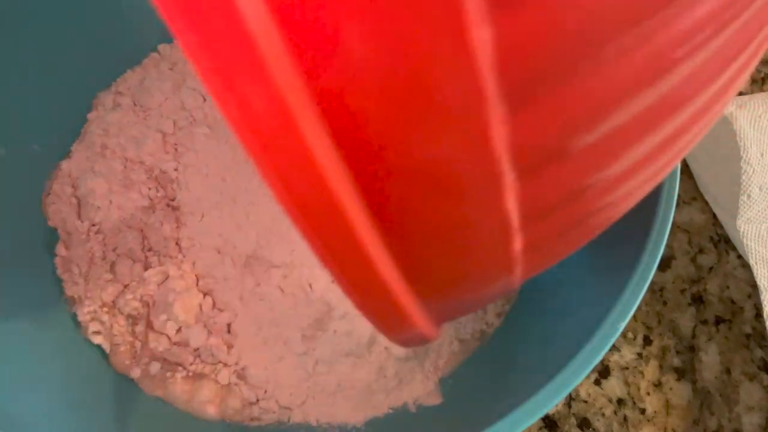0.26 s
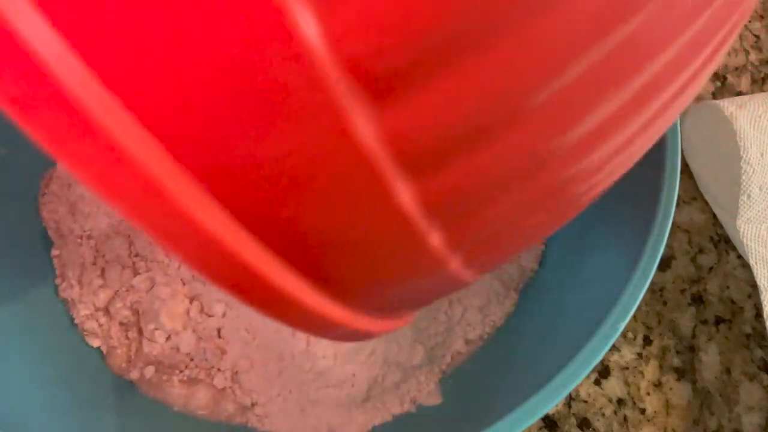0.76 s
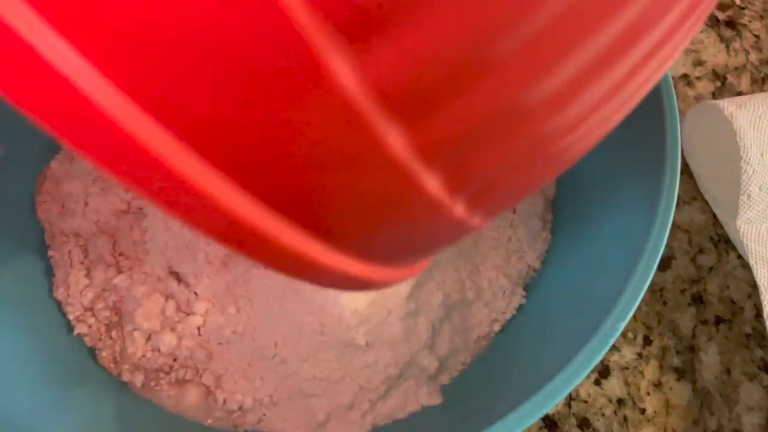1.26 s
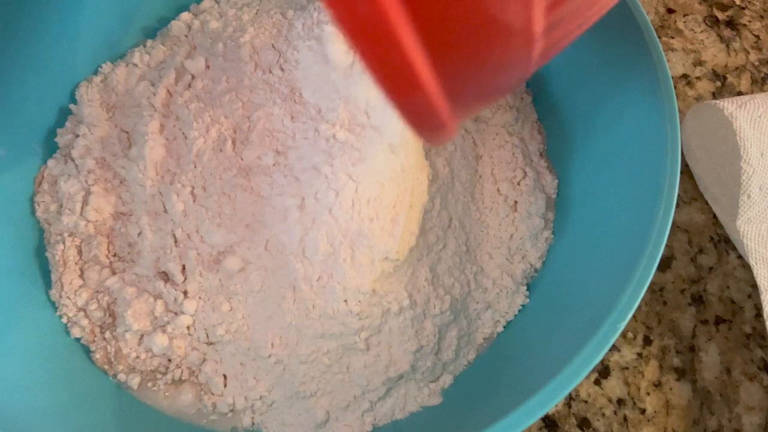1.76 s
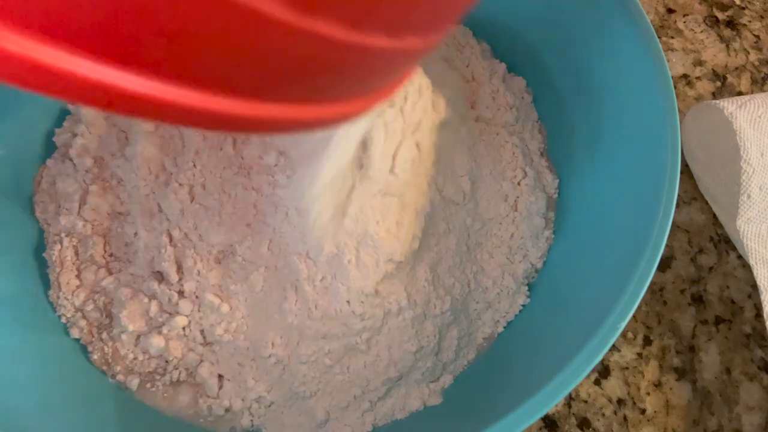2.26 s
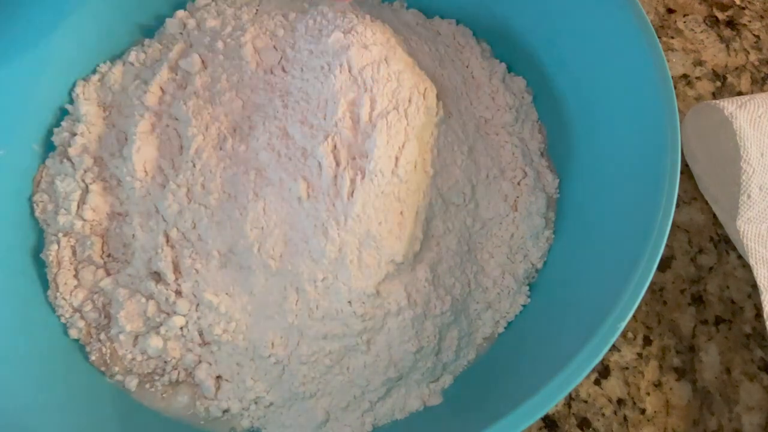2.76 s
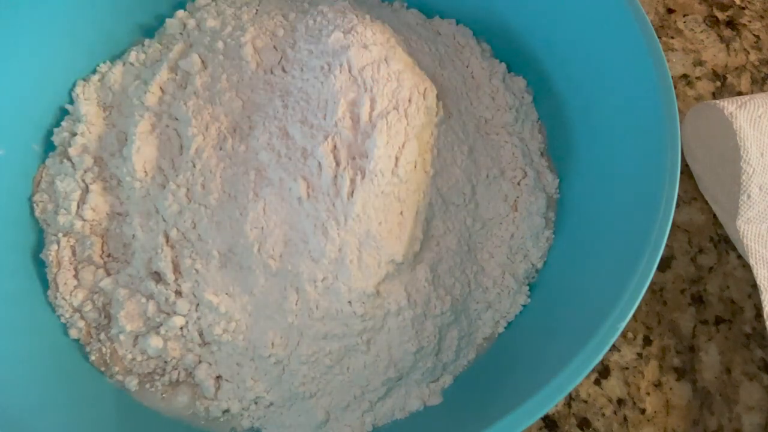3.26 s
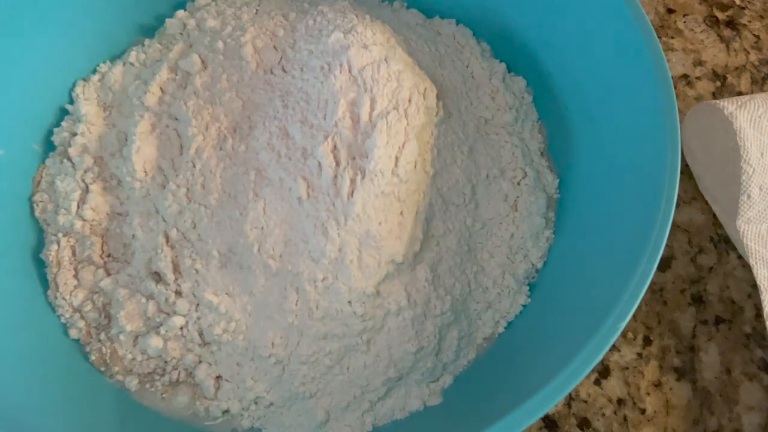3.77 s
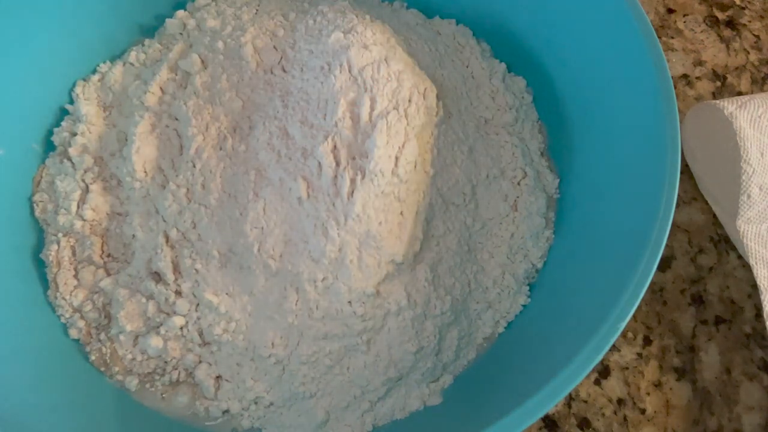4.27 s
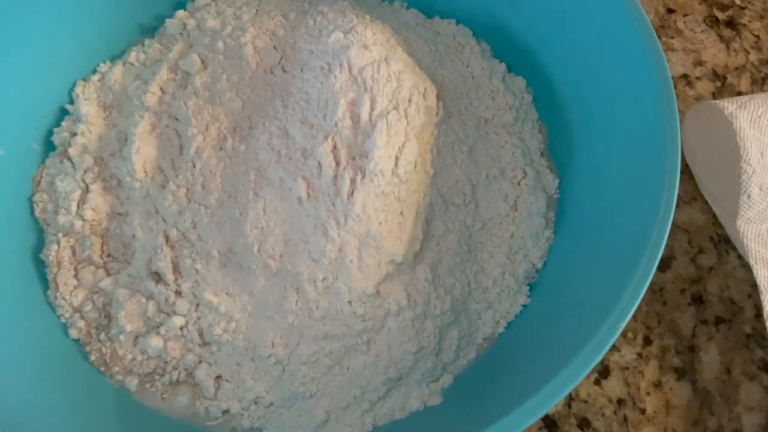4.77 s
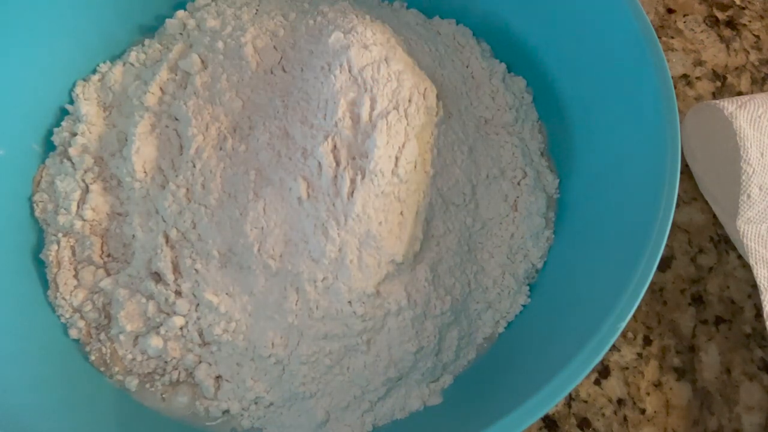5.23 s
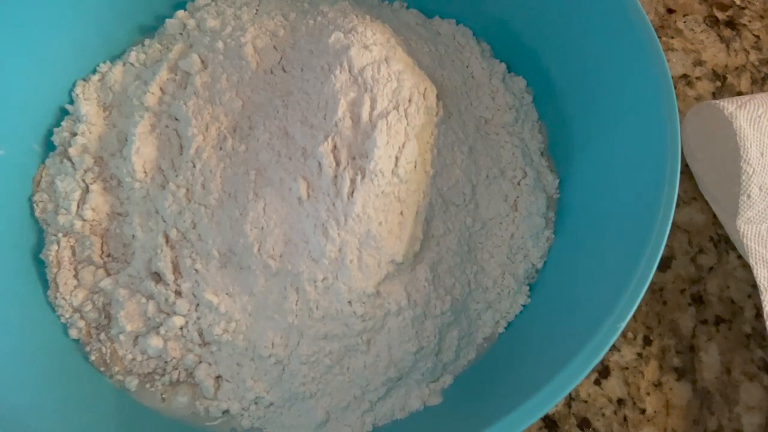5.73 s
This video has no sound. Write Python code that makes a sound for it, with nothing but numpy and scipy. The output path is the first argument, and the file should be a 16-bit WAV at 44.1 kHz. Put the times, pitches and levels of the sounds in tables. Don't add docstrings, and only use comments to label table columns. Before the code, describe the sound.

A steady low refrigerator hum with a soft, slightly wavering fan rumble runs throughout, in a kitchen whose hard walls give short echoes. From 0 to about 1.5 seconds, flour slides in faint, dry, grainy swishes, with barely audible ticks near 1.4 and 1.8. It is quieter until a small rustle at 2.35, then a brighter swish at 3.0 to 3.5. At 3.4 a light tap and a sharp click set off a brief jar ring. Hands brush the plastic softly from 4.0, with small taps, thin squeaks at 4.3 and 4.6 to 4.7, and a growing skid. At 4.76 the tub hits the counter in a very loud, hollow, clipped knock. Smaller clacks follow at 4.9, 5.08 and 5.16, with weaker ticks and a scrape until 5.4. Then the hum remains, with very faint rustles near 5.7 and 5.9. Close stereo microphones add a light hiss.

```python
import sys
import numpy as np
from scipy import signal
from scipy.fft import rfft, irfft
from scipy.io import wavfile
from scipy.ndimage import uniform_filter1d, minimum_filter1d

SR = 44100
rng = np.random.default_rng(int(sys.argv[2]) if len(sys.argv) > 2 else 0)


def decibels_to_gain(level_db):
    exponent = np.asarray(level_db, float) / 20
    return 10 ** exponent


def pcm_store(signal):
    levels = np.round(np.clip(np.atleast_2d(signal), -1, 1) * 32767)
    wavfile.write(sys.argv[1], SR, levels.astype(np.int16).T)


N = 6 * SR


def at_rms(x, db):
    return x * decibels_to_gain(db) / np.sqrt(np.mean(x ** 2))


def along(curve, hz):
    at, value = np.transpose(curve)
    return np.interp(np.log(hz + 1), np.log(at), value)


def sos(order, hz, kind):
    return signal.butter(order, hz, kind, fs=SR, output="sos")


def coloured_noise(gain):
    return irfft(rfft(rng.standard_normal((2, N))) * gain(np.fft.rfftfreq(N, 1 / SR)), N)


def walk(rate):
    k = int(SR / rate)
    held = np.repeat(rng.standard_normal(N // k + 1), k)
    return 1.157 * uniform_filter1d(uniform_filter1d(held, k), k)[:N]


def ring(modes):
    t, out = np.arange(SR // 2) / SR, 0
    for hz, db, t60 in modes:
        decay = np.exp(-np.log(1000) * t / t60)
        build_up = -np.expm1(-t * hz / 0.8)
        out = out + decibels_to_gain(db) * np.sin(2 * np.pi * hz * t) * decay * build_up
    return out


def push(contact):
    t = np.arange(1, 300) / SR
    force = t * np.exp(-4 * t / np.clip(contact, 0.00002, 0.002))
    return force / force.sum()


def blows():
    # t/s, tub level/dB, rim level/dB, crack level/dB, contact/s
    hits = [(1.436, -76, -75, -45.5, 0.000055), (1.767, -75, -86, -54, 0.000025),
            (3.402, -75, -38, -55, 0.00026), (3.4452, -70, -73, -21.5, 0.000095),
            (4.075, -67, -36, -82, 0.0002), (4.315, -82, -54, -44, .0001), (4.595, -70, -44, -40, 0.00016),
            (4.714, -60, -37, -43, 0.00017), (4.733, -60, -36, -50, 0.00014),
            (4.7632, -1, -16, -0.6, 0.00028), (4.902, -24.5, -31.5, -32.5, 0.000099),
            (5.064, -98, -50, -46.5, 0.00007), (5.0796, -17, -12.5, -28, 0.00041),
            (5.1623, -24, -18, -8.5, 0.00019), (5.232, -29, -38, -62, 0.00034),
            (5.263, -40, -25, -37, 0.00017), (5.374, -79, -42.5, -39.5, 0.000094)]
    tub_hz = [129, 190, 290, 361, 390, 500, 514, 552, 730, 929, 1012, 1102, 1400, 1598, 1640, 2110, 2600,
              3128]
    # level/dB, t60/s
    tub_decays = [(-17.5, 0.29), (-18, 0.17), (-8, 0.14), (-11.5, 0.056), (-17.5, 0.077), (10.5, 0.03),
                  (-5, 0.22), (-6.5, 0.19), (-20, 0.2), (-7.5, 0.13), (-13.5, 0.25), (-11.5, 0.17),
                  (-6, .02), (-5, 0.1), (-12, 0.064), (-17.5, 0.15), (-15, 0.21), (-23.5, .15)]
    # f/Hz, level/dB, t60/s
    rim_modes = [(894, 2.5, 0.019), (1400, 6, 0.0098), (1800, 1, 0.0048), (2287, 8, 0.01),
                 (3020, 9.5, 0.006), (3396, 4, 0.012), (3900, -3.5, 0.006)]
    # f/Hz, level/dB, t60/s
    jar_modes = [(496, 2.5, 0.032), (932, 0, 0.052), (1330, 0, 0.025), (1810, -4.5, 0.042),
                 (2140, 9, 0.024), (2670, 10, 0.025), (3490, 9, .018), (3550, -5, 0.03), (4200, -18, 0.016),
                 (4980, -1.5, 0.027), (5830, -1, 0.017), (6240, -23, 0.012)]
    rim_gap_s, base_gap_s = 0.00034, 0.00051
    jar_s, jar_db = 3.4452, -30.5

    tub, rim = ring([(hz, *mode) for hz, mode in zip(tub_hz, tub_decays)]), ring(rim_modes)
    t = np.arange(len(tub)) / SR
    counter = sos(2, [313 / 3, 313 * 2], "bandpass")
    out = np.zeros((2, N + SR))
    for s, tub_db, rim_db, crack_db, contact in hits:
        aside = 0.94 if s > 4 else 0.2
        crack, thud = rng.standard_normal((2, len(t)))

        snap = crack * t / 0.0003 * np.exp(-t / 0.0009)
        snap = signal.fftconvolve(snap, push(0.25 * contact))[:len(t)]
        light = decibels_to_gain(rim_db) * rim + decibels_to_gain(crack_db) * snap

        chatter = crack[::-1] * np.exp(-t / 0.033)
        buzz = signal.fftconvolve(np.diff(tub, prepend=0), chatter)[:len(t)]
        thud = at_rms(signal.sosfilt(counter, thud), -6) * np.exp(-t / 0.025)
        heavy = thud - tub + decibels_to_gain(-33.5) * buzz

        rim_part = signal.fftconvolve(light, push(contact))
        base_part = decibels_to_gain(tub_db) * signal.fftconvolve(heavy, push(2.24 * contact))
        for sound, gap in ((rim_part, rim_gap_s), (base_part, base_gap_s)):
            for port, at in enumerate((s, s + aside * gap)):
                start = int(at * SR)
                out[port, start:start + len(sound)] += sound
    start = int(jar_s * SR)
    out[:, start:start + len(t)] += decibels_to_gain(jar_db) * ring(jar_modes)
    return signal.sosfilt(sos(2, 110, "highpass"), out[:, :N])


def squeaks():
    # t/s, level/dB, f/Hz, length/s
    rubs = [
        (4.325, -48.5, 2294, 0.022),
        (4.588, -53, 5400, .02),
        (4.599, -55, 6280, 0.081),
        (4.712, -46, 6650, 0.012),
    ]
    out = np.zeros(N)
    for s, db, hz, length in rubs:
        t = np.arange(N) / SR - s
        fade = (t > 0) * np.exp(-(t / length) ** 2)
        out += decibels_to_gain(db + 3.3 * walk(240)) * np.sin(2 * np.pi * hz * t) * fade
    return out


def strokes(rows, sheen_db, rise):
    t, power = np.arange(N) / SR, 0
    for s, hold, db, fade, body_db in rows:
        before = np.maximum(s - t, 0) / (rise * fade)
        after = np.maximum(t - s - hold, 0) / fade
        envelope = decibels_to_gain(db - 20 * (before + after))
        power = power + envelope ** 2 * decibels_to_gain([[0], [body_db], [sheen_db]]) ** 2
    return power


def rustle():
    # t/s, hold/s, level/dB, fade per 20 dB/s, body level/dB
    flour_strokes = [(0.0, .002, -68, 0.27, 5), (0.2, 0.18, -59.5, 0.37, -4),
                     (0.588, .01, -61.5, 0.04, -7.5), (0.72, 0.065, -66, 0.37, -9.5),
                     (0.87, 0.11, -62.5, .13, 9), (1.174, 0.0061, -62.5, .17, 2.5),
                     (1.335, .01, -73, 0.2, 10.5), (2.35, 0.023, -60.5, 0.09, 4.5),
                     (3.02, .045, -52, .07, -7), (3.09, 0.45, -61, 0.09, -2.5),
                     (3.86, 0.068, -64.5, .25, 1.5), (5.93, 0.015, -63.5, 0.07, -23)]
    # t/s, hold/s, level/dB, fade per 20 dB/s, body level/dB
    hand_strokes = [(1.51, 0.0045, -77, .1, 3), (1.584, .005, -84, .12, 0), (1.836, .01, -84, .2, 6),
                    (2.052, .02, -75.5, .35, 7), (2.646, 0.0092, -79.5, .3, 9.5),
                    (3.425, .02, -59.5, 0.05, 10.5), (3.46, 0.066, -55.5, .1, -4), (3.6, 0.12, -70, .2, -7),
                    (4.0, 0.25, -68.5, .2, 1), (4.36, 0.3, -65, .2, -2), (5.7, 0.063, -79, .2, 1)]
    # t/s, hold/s, level/dB, fade per 20 dB/s, body level/dB
    tub_skids = [(4.322, .01, -57.5, 0.11, -1.5), (4.55, 0.033, -56.5, 0.12, -13),
                 (4.59, 0.0089, -47, 0.12, -13), (4.62, 0.21, -51, 0.045, -4.5),
                 (4.775, .03, -47, 0.24, 9.5), (5.02, 0.092, -79, 0.091, 10),
                 (5.175, 0.013, -47.5, 0.16, -13), (5.22, .01, -55, 0.11, 6), (5.385, .005, -63, .08, 2.5)]
    # f/Hz, level per Hz/dB
    brush_colour = [(1500, -24.5), (2500, 6), (3300, 1), (6000, -0.5), (9000, -8), (16000, -20.5)]
    # f/Hz, level per Hz/dB
    sheen_colour = [(5500, -25), (7000, -6), (8500, -1), (9900, -3), (11300, 1), (13500, -4), (16000, -8)]

    power = strokes(flour_strokes, sheen_db=6.7, rise=1)
    power = power + strokes(hand_strokes, sheen_db=-0.6, rise=0.39)
    power = power + strokes(tub_skids, sheen_db=-14.5, rise=0.23)
    to_hiss, to_body, to_sheen = np.sqrt(power)
    to_body = np.hypot(to_body, decibels_to_gain(-79))

    hiss = at_rms(coloured_noise(lambda hz: decibels_to_gain(along(brush_colour, hz))), 3.72)
    sheen = at_rms(coloured_noise(lambda hz: decibels_to_gain(along(sheen_colour, hz))), 0.57)
    body = at_rms(coloured_noise(lambda hz: (hz / 2700) ** 0.81 / (1 + (hz / 2700) ** 4.58)), 3.1)
    grain = decibels_to_gain(0.77 * walk(60) + 0.5 * walk(230))
    crumbs = decibels_to_gain(2.6 * walk(400))
    return grain * (to_hiss * hiss + to_sheen * sheen + to_body * crumbs * body)


def kitchen(x):
    # f/Hz, t60/s
    room_decay = [(100, 0.38), (500, 0.44), (2000, 0.62), (6000, 0.32), (14000, 0.16)]
    t, tail = np.arange(SR // 2) / SR, 0
    for hz in 80 * 2. ** np.arange(8):
        octave = sos(2, [hz / np.sqrt(2), hz * np.sqrt(2)], "bandpass")
        noise = signal.sosfilt(octave, rng.standard_normal((2, len(t))))
        tail = tail + noise * np.exp(-np.log(1000) * t / along(room_decay, hz))
    tail = tail * np.clip(t / 0.002, 0, 1) ** 2
    tail = tail * decibels_to_gain(-10.5) / np.sqrt(np.sum(tail ** 2) / 2)
    return signal.fftconvolve(x[None], tail, axes=1)[:, :N]


def refrigerator():
    # f/Hz, level per Hz/dB
    air_colour = [(15, -83.5), (25, -43.5), (43, -16), (82, -15.5), (124, -3), (155, -9.5), (229, -16.5),
                  (316, -19.5), (435, -19.5), (492, -22.5), (645, -22.5), (695, -24.5), (2560, -47),
                  (2900, -61), (9000, -68.5), (11700, -100), (19800, -120)]
    # f/Hz, share (0-1)
    air_alike = [(30, 0.76), (150, 0.97), (400, 0.82), (1200, 0.05), (3000, 0.07), (9000, 0.3)]
    # t/s, level/dB
    air_swell = [(0.0, -47), (1.83, -47.5), (2.01, -46.5), (2.38, -46.5), (2.74, -48.5), (3.07, -48.5),
                 (3.6, -47.5), (3.88, -48), (4.19, -47.5), (4.6, -47.5)]
    # f/Hz, rms level/dB
    motor_lines = [(58.6, -49.5), (119.0, -45)]
    # f/Hz, width/Hz, rms level/dB
    cabinet_modes = [(105, 12, -51), (226.8, 17.7, -49.5), (641, 5.5, -58.5), (2530, 41, -72.5),
                     (2665, 5.9, -73.5)]

    hz, t = np.fft.rfftfreq(N, 1 / SR), np.arange(N) / SR
    colour = at_rms(decibels_to_gain(along(air_colour, hz)), -39)
    for centre, width, db in cabinet_modes:
        peak = 1 / (1 + (2 * (hz - centre) / width) ** 2)
        colour = np.hypot(colour, at_rms(peak, db))

    alike = along(air_alike, hz)
    shared, left, right = rfft(rng.standard_normal((3, N))) * colour
    late = np.exp(-2j * np.pi * hz * 0.00058)
    common = np.sqrt(alike) * shared * np.array([late, np.ones_like(late)])
    own = np.sqrt(1 - alike) * np.array([left, right])
    air = irfft(common + own, N)

    drift = np.cumsum(1 + 0.0065 * walk(1.457)) / SR
    hum = 0
    for line_hz, db in motor_lines:
        hum = hum + np.sqrt(2) * decibels_to_gain(db + 2.7 * walk(5.4)) * np.sin(2 * np.pi * line_hz * drift)
    swell_db = np.interp(t, *np.transpose(air_swell))
    return air * decibels_to_gain(swell_db - swell_db.mean()) + hum


def scene():
    near = blows() + squeaks()
    return near + kitchen(near[0]) + rustle() + refrigerator()


def thin_treble(x, threshold):
    hz, _, z = signal.stft(x, SR, nperseg=512)
    power = uniform_filter1d(uniform_filter1d(np.abs(z) ** 2, size=6, axis=0), size=2, axis=1)
    usual = uniform_filter1d(uniform_filter1d(np.log(power + 1e-18), size=9, axis=1), size=9, axis=0)
    kept = power > np.exp(usual) * decibels_to_gain(along(threshold, hz))[:, None] ** 2

    lowest_hz = threshold[0][0]
    treble_db = 10 * np.log10(power[hz > lowest_hz] + 1e-18).mean(axis=0)
    jump_db = treble_db - minimum_filter1d(treble_db, size=3, origin=1)
    kept = kept | (jump_db > 8) | (hz < lowest_hz)[:, None]
    return signal.istft(z * kept, SR)[1][:N]


def low_pass(x):
    return signal.sosfilt(signal.butter(12, 16400, fs=SR, output="sos"), x)


def record(dry):
    # f/Hz, level over the local mean needed to survive/dB
    mid_threshold = [(8800, -23), (9300, 12.5), (12600, 10.5), (13400, 1.5), (14200, -0.5), (15500, -1),
                     (15900, 11.5)]
    # f/Hz, level over the local mean needed to survive/dB
    side_threshold = [(12000, -24), (14000, -6), (14600, -3.5), (15500, 3), (15900, 11)]
    hiss = decibels_to_gain(-72.5) * rng.standard_normal(dry.shape)
    left, right = np.clip(signal.sosfilt(sos(2, 45, "highpass"), dry + hiss), -1, 1)
    mid = thin_treble((left + right) / 2, mid_threshold)
    side = thin_treble((left - right) / 2, side_threshold)
    return low_pass(np.clip([mid + side, mid - side], -1, 1))


dry = scene()
out = record(dry)
pcm_store(out)
```